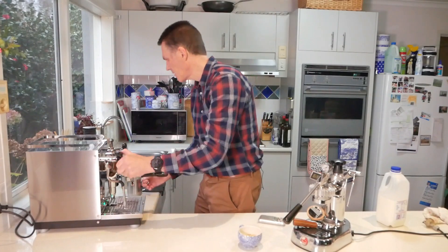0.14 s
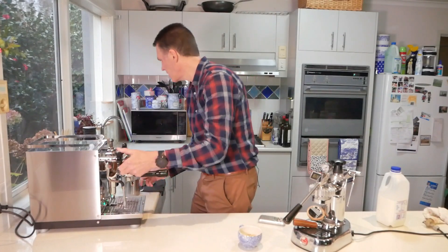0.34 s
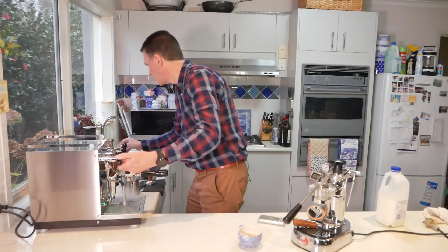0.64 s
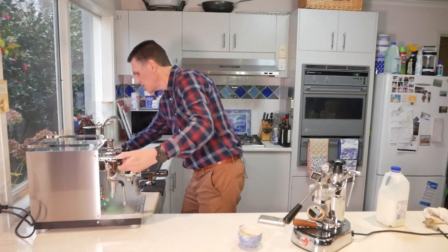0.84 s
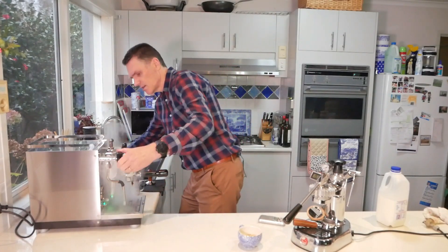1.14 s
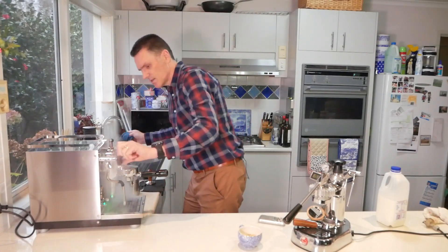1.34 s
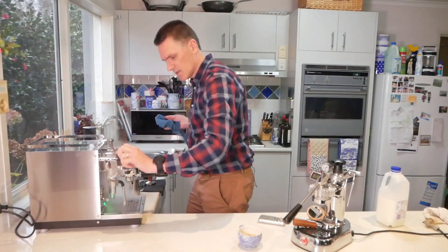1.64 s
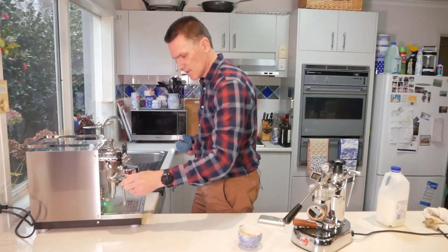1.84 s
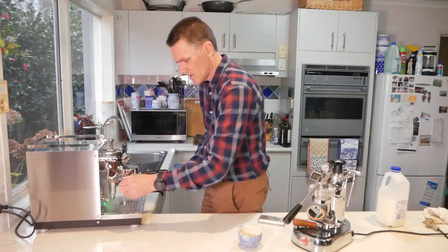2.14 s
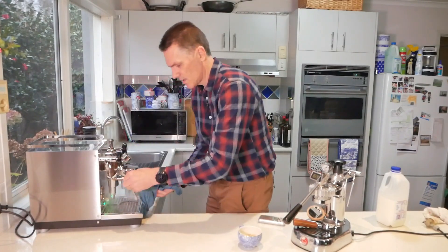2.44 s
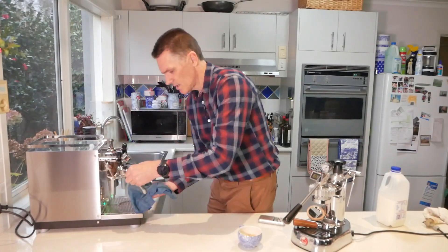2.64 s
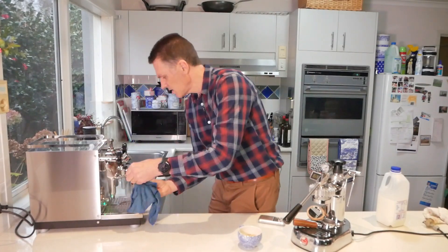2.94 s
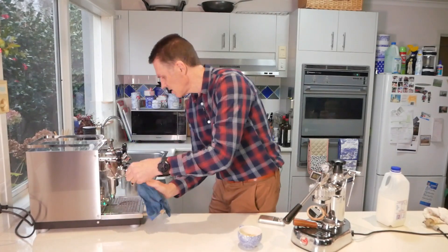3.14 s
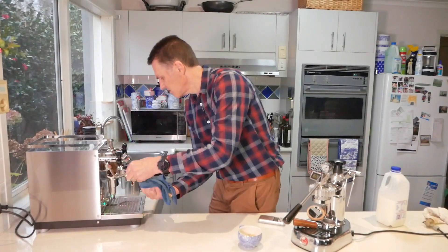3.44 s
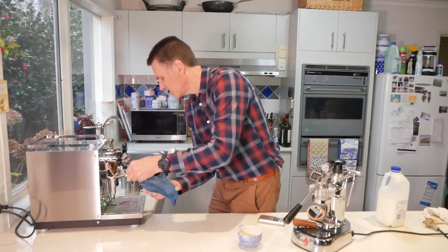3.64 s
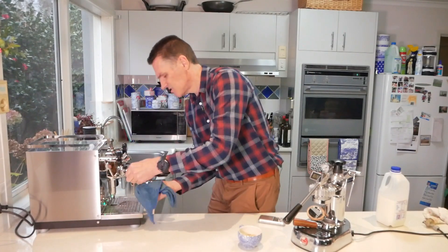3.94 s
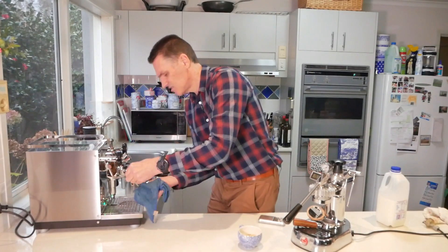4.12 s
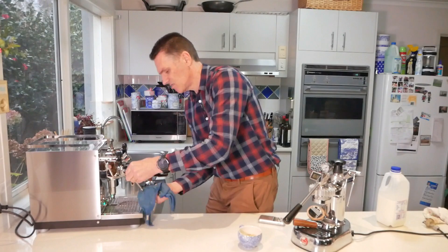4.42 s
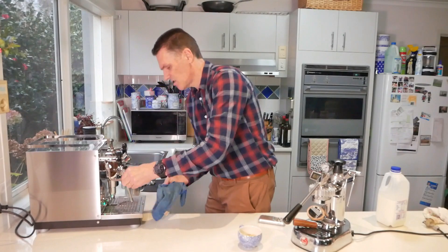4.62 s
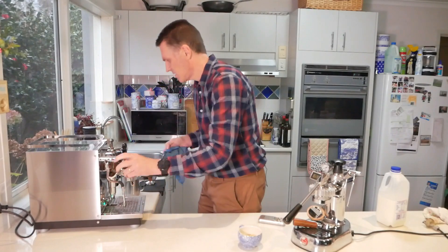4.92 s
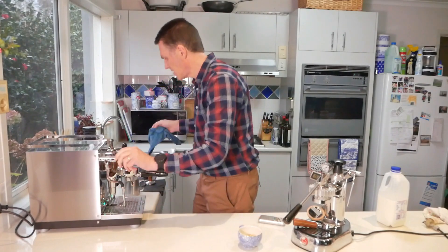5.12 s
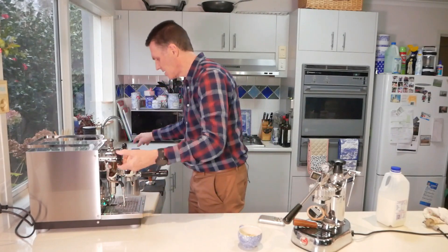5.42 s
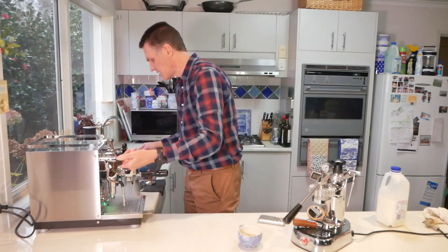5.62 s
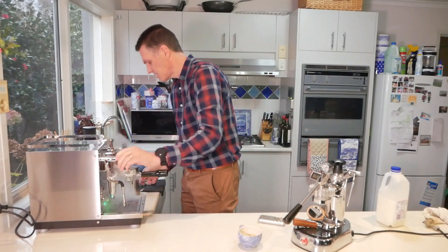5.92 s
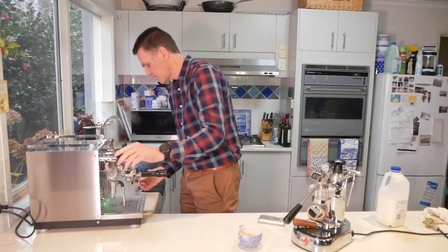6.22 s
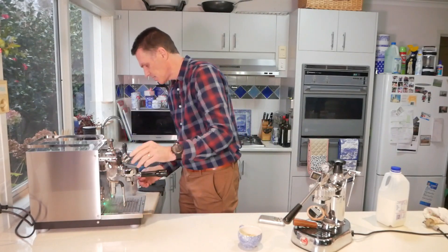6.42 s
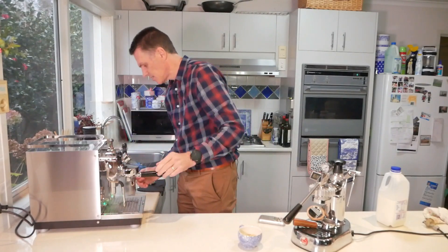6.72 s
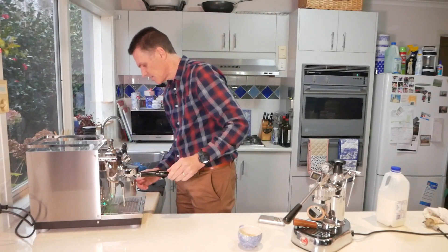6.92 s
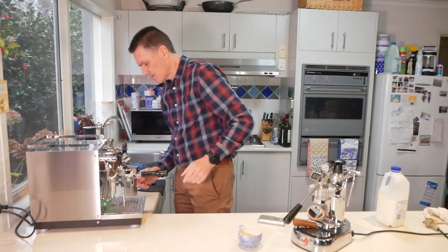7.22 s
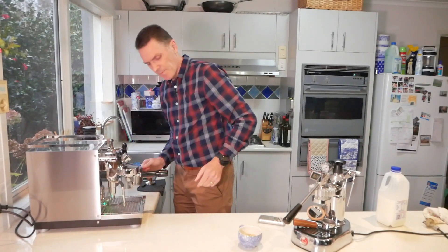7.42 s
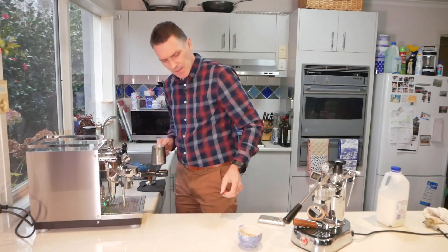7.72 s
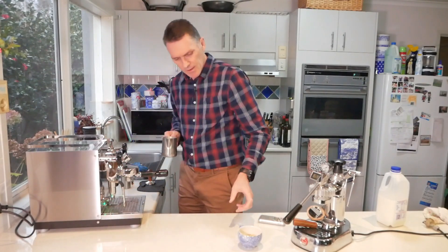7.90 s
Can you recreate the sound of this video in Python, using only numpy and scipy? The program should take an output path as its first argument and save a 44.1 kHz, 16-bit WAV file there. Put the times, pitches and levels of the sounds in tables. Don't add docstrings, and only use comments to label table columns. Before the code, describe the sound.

In a small kitchen, close clip-on microphone, a steel jug clunks down on a bench. A half-second roar of wet, bright steam hits a tray, followed by small knob clicks. Cloth rustles and rubs quietly over a steam wand. A shorter, drier steam burst hisses, more faint ticks, then three very loud, evenly spaced jug knocks ring woodily and overload. Low room hum and clothing rumble lie beneath.

```python
import sys
import numpy as np
from scipy import signal
from scipy.fft import rfft, irfft
from scipy.io import wavfile
from scipy.ndimage import uniform_filter1d, map_coordinates

SR = 44100
rng = np.random.default_rng(int(sys.argv[2]) if len(sys.argv) > 2 else 0)


def transcribe(u):
    v = np.clip(np.atleast_2d(u).T, -1, 1)
    q = np.round(v * 32767).astype(np.int16)
    wavfile.write(sys.argv[1], SR, q)


def voltage_ratio(decibels):
    exponent = np.asarray(decibels, float) / 20
    return 10 ** exponent


N = 355401


def unit_power(x):
    return x / np.sqrt(np.mean(x ** 2) + 1e-20)


def gesture(loudest_s, rise_s, fall_s, level_db):
    late = np.arange(N) / SR - loudest_s
    away = np.where(late < 0, -late / max(rise_s, .005), late / max(fall_s, .005))
    return voltage_ratio(level_db - 20 * away)


def at_hz(points, hz):
    table_hz, value = np.transpose(points)
    return np.interp(np.log(hz), np.log(table_hz), value)


def drift(rate_hz):
    r = np.exp(-80 * np.pi * rate_hz / SR)
    white = rng.standard_normal(N // 40 + 2002)
    slow = unit_power(signal.lfilter([1], [1, -2 * r, r * r], white)[2000:])
    return np.interp(np.arange(N) / 40, np.arange(len(slow)), slow)


def band(x, low_hz, high_hz, order=3):
    return signal.sosfilt(signal.butter(order, [low_hz, high_hz], "band", fs=SR, output="sos"), x)


def coloured(spectrum, peaks=()):
    hz = np.arange(N // 2 + 1) * SR / N + 1
    gain = voltage_ratio(at_hz(spectrum, hz))
    for centre_hz, width_hz, level_db in peaks:
        gain = gain * (1 + voltage_ratio(level_db) / (1 + (2 * (hz - centre_hz) / width_hz) ** 2))
    return irfft(rfft(rng.standard_normal(N)) * gain, N)


def ring(push, hz, t60_s):
    r, w = voltage_ratio(-60 / (t60_s * SR)), 2 * np.pi * hz / SR
    return signal.lfilter([0, np.sin(w)], [1, -2 * r * np.cos(w), r * r], push + 1e-18)


# pitch_hz [Hz], level_db [dB per Hz]
HUM_SPECTRUM = [(71, -34), (120, -10), (167, -10.5), (282, 3), (401, -4.5), (468, -5.5), (602, -5),
                (746, -12), (1120, -16), (1360, -26), (1530, -18.5), (1860, -23), (12500, -30),
                (16200, -61), (22000, -120)]
HUM_DB = -60


def room_hum():
    spectrum = [(60, -49.5)] + [p for p in HUM_SPECTRUM if p[0] < 12600]
    return voltage_ratio(HUM_DB) * unit_power(coloured(spectrum)) * voltage_ratio(1.0 * drift(2.7))


# loudest_s [s], rise_s [s], # fall_s
# [s], level_db [dB]
CLOTHING_BUMPS = [(0.0, .1, 0.055, -53.5), (.1, 0.031, 0.22, -49), (.61, .05, .05, -58),
                  (.95, .04, 0.055, -51), (1.04, .06, .4, -55.5), (1.42, 0.039, 0.073, -46),
                  (1.63, 0.16, 0.043, -51), (1.74, 0.06, 0.069, -52), (1.96, 0.12, 0.074, -56),
                  (2.19, 0.41, 0.19, -65.5), (2.5, 0.12, .1, -59), (2.72, .15, .4, -62),
                  (4.19, 0.086, 0.2, -65), (4.61, .3, 0.44, -70.5), (5.1, 0.085, 0.1, -64),
                  (5.23, 0.077, .4, -73.5), (5.55, 0.13, 0.065, -42.5), (5.882, .3, 0.062, -61.5),
                  (6.169, 0.19, .1, -68.5), (6.57, 0.025, .1, -69.5), (7.45, 0.43, 0.33, -70)]
RUMBLE_REST_DB = -68.5


def clothing_rumble():
    low = band(rng.standard_normal(N), 15, 120, order=2)
    lumps = unit_power(low * voltage_ratio(2.0 * drift(14)))
    return lumps * (voltage_ratio(RUMBLE_REST_DB) + sum(gesture(*bump) for bump in CLOTHING_BUMPS))


# loudest_s [s], rise_s [s], fall_s [s], #
# rustle_db [dB], rub_db [dB]
STROKES = [(.43, .5, 0.28, -71, -69), (1.801, 1, 0.18, -64.5, -54), (2.14, 0.41, 0.21, -70, -70),
           (2.35, 0.22, 0.95, -74, -71.5), (2.582, 0.011, 0.6, -68, -64.5), (2.685, 0.17, .03, -57.5, -70),
           (2.80, 0.055, 0.11, -54.5, -66), (2.886, 0.092, 0.21, -56.5, -79),
           (3.048, 0.47, .08, -69.5, -75), (3.23, 0.19, 0.065, -83, -72), (3.41, .3, 0.29, -82, -68),
           (3.56, .02, 0.03, -71.5, -71), (3.68, 0.12, 0.24, -93, -71), (3.819, 0.19, 0.13, -79, -85.5),
           (4.1, 0.13, .07, -66, -66), (4.77, 0.081, .1, -74, -68), (4.92, 0.083, 0.092, -72, -59.5),
           (5.2, 0.025, 0.034, -74, -69.5), (5.44, 0.13, .1, -71.5, -58.5), (6.299, .3, 0.21, -77.5, -71),
           (6.55, 0.16, .05, -78.5, -60.5), (7.35, .1, 0.19, -65, -55), (7.666, .12, 0.22, -69.5, -74),
           (7.874, .04, .05, -83, -59.5)]
# pitch_hz [Hz], level_db [dB per Hz]
RUSTLE_SPECTRUM = [(1180, -30.5), (2000, -9.5), (2280, -5), (2710, 0), (4300, -2), (5390, -4.5),
                   (6640, -5.5), (7910, -11), (11300, -2), (16000, -17.5)]
# pitch_hz [Hz], level_db [dB per Hz]
RUB_SPECTRUM = [(240, -26), (400, 13), (458, -20.5), (569, -1), (723, -4), (1710, -12), (2400, -35),
                (3120, -66), (5280, -120)]
SHIRT_RUB_DB = -76


def cloth():
    rustle = unit_power(coloured(RUSTLE_SPECTRUM + [(17000, -62.5)]))
    rustle = unit_power(band(rustle, 2000, 17000)) * voltage_ratio(1.2 * drift(25) + 2.0 * drift(200))
    rub = unit_power(coloured(RUB_SPECTRUM + [(3000, -39.5)]))
    rub = unit_power(band(rub, 450, 2800)) * voltage_ratio(3.0 * drift(25))
    out = voltage_ratio(SHIRT_RUB_DB) * rub
    for loudest_s, rise_s, fall_s, rustle_db, rub_db in STROKES:
        fibres = voltage_ratio(rustle_db) * rustle + voltage_ratio(rub_db) * rub
        out = out + gesture(loudest_s, rise_s, fall_s, 0) * fibres
    return out


# start_s [s], level_db [dB peak], pitch_hz [Hz], # t60_s
# [s], crack_db [dB re ring]
SMALL_CONTACTS = [(0.029, -40, 1200, 0.018, -20.5), (0.111, -31, 3580, 0.016, 2.5),
                  (1.128, -21.5, 900, 0.047, -22), (1.229, -28, 744, 0.11, -30),
                  (1.329, -33.5, 1033, 0.048, -42), (1.479, -28.5, 1090, 0.0078, -11.5),
                  (1.503, -34.5, 870, 0.0068, 1), (2.346, -46, 680, 0.089, -34),
                  (2.615, -40, 11100, 0.005, -4), (3.137, -54, 2970, .006, 21),
                  (3.558, -47.5, 600, .04, -26), (4.742, -38, 752, 0.076, -33),
                  (4.775, -43, 680, 0.072, -36), (4.801, -41.5, 267, 0.19, -40),
                  (5.466, -39.5, 850, 0.027, -24), (5.491, -34, 840, 0.038, -15),
                  (5.849, -32, 9800, 0.006, -15), (5.927, -39, 9700, .015, 0), (6.065, -40, 900, .015, -17),
                  (6.112, -45.5, 1067, 0.082, -8), (6.520, -42.5, 1092, 0.047, -28.5),
                  (7.869, -46.5, 1444, 0.035, -10)]


def ticks():
    out, n = np.zeros(N), np.arange(8000)
    for start_s, level_db, pitch_hz, t60_s, crack_db in SMALL_CONTACTS:
        crack = (rng.standard_normal(8000) + 3 * (n == 0)) * voltage_ratio(-60 * n / SR / .011)
        rings = sum(ring(crack, min(pitch_hz * k, 15000), t60_s / k) for k in (.83, 1.0, 1.16))
        rings = band(rings, pitch_hz / 2, min(2 * pitch_hz, 16000), order=1)
        sound = rings / np.abs(rings).max() + voltage_ratio(crack_db) * band(crack, 700, 11000, order=2)
        i = round(start_s * SR)
        out[i:i + 8000] += voltage_ratio(level_db) * sound[:N - i]
    return out


# pitch_hz [Hz], t60_s [s]
ROOM_DECAY = [(60, 0.54), (160, .4), (420, .36), (1100, 0.51), (2500, 0.32), (5000, 0.49), (9000, 0.23),
              (15000, 0.51)]
# pitch_hz [Hz], level_db [dB per Hz]
ROOM_COLOUR = [(60, -22.5), (150, -14), (300, -2.5), (550, -1.5), (1000, -2), (1500, -4.5), (2000, -18.5),
               (2800, -11), (4500, -23.5), (9000, -18), (15000, -17.5)]


def kitchen(x, build_s=0.00067):
    t = np.arange(SR) / SR
    edges_hz = 45 * 2 ** np.arange(0, 8.6, .5)
    white, answer = rng.standard_normal((2, len(x), SR)), 0
    for k, (low_hz, high_hz) in enumerate(zip(edges_hz, edges_hz[1:])):
        hz = np.sqrt(low_hz * high_hz)
        fade_db = at_hz(ROOM_COLOUR, hz) - 60 * t / at_hz(ROOM_DECAY, hz)
        answer = answer + band(white[k % 2], low_hz, high_hz, order=2) * voltage_ratio(fade_db)
    answer = answer * (1 - np.exp(-t / build_s))
    return signal.fftconvolve(x, answer, axes=1)[:, :N].sum(axis=0)


def contact_force(hz):
    phase = np.arange(200) * 2 * np.pi * hz / SR
    force = phase ** 2 * np.exp(-phase)
    return force / force.sum()


def milk_slosh(delay_s=0.0078, t60_s=0.064):
    t = np.clip(np.arange(SR // 2) / SR - delay_s, 0, 1)
    swell = (1 - np.exp(-t / 0.0011)) * voltage_ratio(-60 * t / t60_s)
    return band(rng.standard_normal(SR // 2), 5700, 16500, order=2) * swell


# start_s [s], level_db [dB of impulse], contact_hz [Hz], ring_db [dB], steel_db [dB]
JUG_BLOWS = [
    (0.112, -8.5, 2120, -7.5, -25.5),
    (0.2396, -15.5, 853, -6, -36),
    (6.5846, 0, 2380, -1.5, -20.5),
    (6.5933, -6.5, 2200, -2.5, -30),
    (6.8758, 1, 2190, -4, -23),
    (7.1301, -1.5, 2290, 0, -20.5),
]
# pitch_hz [Hz], level_db [dB], t60_s [s]
BENCH_MODES = [(282, -10.5, 0.29), (358, -10.5, 0.16), (439.3, -8.5, 0.11), (497, -12, 0.059),
               (719, -13.5, 0.061), (763, -2, 0.06), (877, -4.5, 0.077), (1061, -1.5, 0.032),
               (1115.5, -1, 0.069), (1352, -2, 0.039), (1516, -4, 0.041), (1686, -7.5, 0.045)]
# pitch_hz [Hz], level_db [dB], t60_s [s]
JUG_MODES = [(2750, -27.5, 0.0047), (3620, -24, 0.0017), (7700, -45, 0.07)]
THUD_DB, THUD_GIVE = -32.5, 0.4
RIM_LATE_S = .0025


def knocks():
    length, late = SR // 2, round(RIM_LATE_S * SR)
    direct, feed = np.zeros(N), np.zeros((len(JUG_BLOWS), N))
    for spot, (start_s, level_db, contact_hz, ring_db, steel_db) in enumerate(JUG_BLOWS):
        force, click = np.zeros((2, length))
        force[:200] = voltage_ratio(level_db) * contact_force(contact_hz)
        click[late:late + 200] = voltage_ratio(level_db + steel_db) * contact_force(7000)
        spread = voltage_ratio(2.5 * rng.normal(0, 1, len(BENCH_MODES) + len(JUG_MODES)))
        bench, steel = np.zeros(length), click
        for (hz, mode_db, t60_s), luck in zip(BENCH_MODES, spread):
            bench = bench + ring(force, hz, t60_s) * voltage_ratio(mode_db + ring_db) * luck
        for (hz, mode_db, t60_s), luck in zip(JUG_MODES, spread[len(BENCH_MODES):]):
            steel = steel + ring(click, hz, t60_s) * voltage_ratio(mode_db) * luck
        thud = ring(force, 67, 0.21) + ring(force, 106, 0.23)
        thud = thud * voltage_ratio(THUD_DB - THUD_GIVE * level_db)
        slosh = voltage_ratio(level_db - 6.0) * click.sum() * milk_slosh()
        sound = band(bench, 240, 17000, order=2) + voltage_ratio(9.5) * steel + thud + slosh
        i = round(start_s * SR)
        direct[i:i + length] += sound[:N - i]
        feed[spot, i:i + length] = (force + voltage_ratio(12.5) * np.roll(steel, shift=-late))[:N - i]
    return direct, feed


# start_s [s], notch_spacing_hz [Hz], strength [0-1]
BODY_LEAN = [(.55, 2157, 0), (.75, 2460, 0.1), (1.0, 2490, 0.1), (1.18, 2610, 0.1), (1.299, 2644, .2),
             (5.501, 2525, .25), (5.76, 2700, .25), (5.85, 2700, 0.1)]
HAND_ECHO_S, HAND_SHARE, HAND_SWAY = .0009, .22, .2


def steel_echo(x):
    start_s, spacing_hz, strength = np.transpose(BODY_LEAN)
    n = np.arange(N)
    lag = SR / np.interp(n / SR, start_s, spacing_hz) * (1 + .006 * drift(4))
    near = map_coordinates(x, [n - lag], order=3)
    far = map_coordinates(x, [n - 8.1 * lag], order=3)
    share = np.clip(np.interp(n / SR, start_s, strength), 0, .9)
    hand_lag = SR * HAND_ECHO_S * (1 + HAND_SWAY * drift(1.2))
    hand = map_coordinates(x, [n - hand_lag], order=3)
    return x - share * (near - .5 * far) + HAND_SHARE * hand


# start_s [s], shut_s [s], opening_s [s], closing_s [s], level_db [dB]
PURGE_VALVE = [
    (0.559, 1.114, 0.028, 0.047, -27),
    (5.498, 5.73, 0.025, 0.012, -25.5),
]
PURGE_PARTS = [
    (-3.5, 4.1, -32.5, .16),
    (-4.5, 2.3, -54.5, .03),
]
# pitch_hz [Hz], level_db [dB per Hz]
JET_SPECTRA = [
    [(120, -26.5), (200, -23.5), (273, -7.5), (507, -10.5), (731, -4), (1030, -12), (1180, -6),
     (1820, -12.5), (2270, -8), (3150, -9), (4140, -5), (4710, -6.5), (7430, -9), (11900, 0.5),
     (15700, -4.5)],
    [(120, -24), (200, -18.5), (278, -1), (566, -8.5), (680, -0.5), (927, -1.5), (1030, -3), (1550, -3),
     (1690, -7.5), (3150, -4), (3580, -1.5), (4710, -6.5), (7560, -19), (12200, -13), (15700, -26)],
]
# pitch_hz [Hz], width_hz [Hz], level_db [dB]
NOZZLE_WHISTLES = [
    [(730, 37, -11.5), (4240, 200, -7), (5634, 900, -3.5), (9500, 790, -5), (12480, 900, -6)],
    [(680, 35, 2.5), (3700, 500, -7), (6060, 160, -4), (9550, 910, -10), (12700, 230, -25.5)],
]
DRIBBLE_TILT = (9.5, 6.5, 5.5)
LINGER_T60_S, DRIBBLE_T60_S = (0.76, 0.58, 0.54), (4.6, 1.9, 1.3)
LINGER_DB, DRY_OUT_DB_PER_S = -4.5, 10.5
CLEARS_S = .25


def steam(valve, parts, spectrum, whistles, flutter_db=0.53):
    start_s, shut_s, opening_s, closing_s, level_db = valve
    splash_db, top_db, dribble_db, sag = parts
    t = np.arange(N) / SR
    since = np.clip(t - start_s, 0, shut_s - start_s)
    after = np.clip(t - shut_s, 0, None)
    flow = (1 - np.exp(-since / opening_s)) ** 2
    jet = np.exp(-after / closing_s)
    rising = np.cumsum(1 - sag * np.exp(-since / CLEARS_S))
    noise = map_coordinates(coloured(spectrum, whistles), [rising], order=3)
    noise, gust = steel_echo(noise), drift(9)
    out, edges_hz = 0, [120, 2200, 7000, 17000]
    for k, part_db in enumerate([splash_db - DRY_OUT_DB_PER_S * since * jet, 0, top_db]):
        linger = voltage_ratio(LINGER_DB - 60 * after / LINGER_T60_S[k])
        dribble = voltage_ratio(dribble_db + DRIBBLE_TILT[k] - 60 * after / DRIBBLE_T60_S[k])
        fade = jet + (1 - jet) * (linger + dribble)
        flutter = flutter_db * (2.1 * gust + drift(33))
        gain = flow * fade * voltage_ratio(level_db + part_db + flutter)
        out = out + gain * unit_power(band(noise, edges_hz[k], edges_hz[k + 1]))
    return out


def scene():
    direct, feed = knocks()
    small = ticks()
    wet = kitchen(np.vstack([voltage_ratio(-1.5) * feed, voltage_ratio(-35) * small]))
    purges = zip(PURGE_VALVE, PURGE_PARTS, JET_SPECTRA, NOZZLE_WHISTLES)
    jets = sum(steam(*purge) for purge in purges)
    mid = room_hum() + clothing_rumble() + cloth() + small + wet + direct + jets
    return np.array([mid, mid])


OVERLOAD = .62
TOP_BAND_HZ, CUTOFF_HZ = 13200, 15900


def thin_faint_cells(x, margin_db=8.0, bass_db=2.5, quiet_side_db=-19, loud_side_db=-13,
                    loud_from_db=-62, startle_db=14, settle_s=0.2, smear_db=-30):
    hz, _, cells = signal.stft(x, SR, nperseg=1024)
    pairs = np.arange(cells.shape[1]) // 2
    power = uniform_filter1d(np.abs(cells) ** 2, size=5, axis=0)
    power = uniform_filter1d(power, size=3, axis=1)
    level_db = 10 * np.log10(np.abs(power) + 1e-20)
    typical_db = np.median(level_db[:360], axis=0)
    loud = 1 / (1 + np.exp((loud_from_db - typical_db) / 2))

    keep = np.exp(-512 / SR / settle_s)
    used_db = signal.lfilter([1 - keep], [1, -keep], typical_db - typical_db[0]) + typical_db[0]
    startled = np.roll(np.clip((typical_db - used_db) / 12 - .6, -1, 1), shift=6)
    startled = startled + .22 * rng.standard_normal(pairs[-1] + 1)[pairs]
    bass = np.clip(1.3 - hz / 300, 0, 1)[:, None]
    low_mid = np.clip(1 - np.abs(hz - 320) / 200, 0, 1)[:, None]
    bar_db = typical_db - margin_db + startle_db * loud * startled * bass + bass_db * loud * low_mid
    cells = cells / (1 + np.exp(np.clip(2 * (bar_db - level_db), -30, 30)))

    luck = rng.random((25, pairs[-1] + 1))[:, pairs]
    sparks = rng.random((len(hz) // 4 + 1, pairs[-1] + 1))[np.arange(len(hz)) // 4][:, pairs]
    top_on = (sparks < .6 * luck[24]) | (level_db > -95)
    cells = cells * (hz < CUTOFF_HZ)[:, None] * ((hz < TOP_BAND_HZ)[:, None] | top_on)

    rows = (np.log(np.arange(len(cells)) + 2) * 23 / np.log(515)).astype(int)
    patches = luck[rows] < .75 - .70 * loud
    error = cells * patches * np.exp(2j * np.pi * rng.random(cells.shape))
    error = error * voltage_ratio(quiet_side_db + (loud_side_db - quiet_side_db) * loud)
    smear = cells * voltage_ratio(smear_db) * np.exp(2j * np.pi * rng.random(cells.shape))
    mid = signal.istft(cells + smear, nperseg=1024)[1][:N]
    side = signal.istft(error, nperseg=1024)[1][:N]
    return np.array([mid + side, mid - side])


def low_pass(x):
    return signal.sosfilt(signal.butter(12, 16620, fs=SR, output="sos"), x)


def record(dry):
    capsule = dry[0]
    bent = np.tanh((np.abs(capsule) / OVERLOAD) ** 3) ** (1 / 3)
    mix = thin_faint_cells(OVERLOAD * bent * np.sign(capsule))
    return low_pass(mix)


dry = scene()
out = record(dry)
transcribe(out)
```